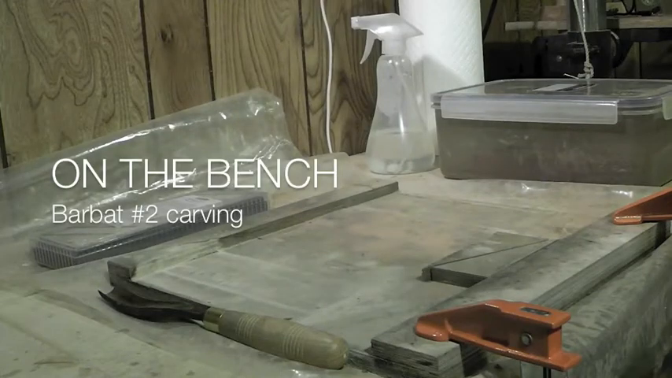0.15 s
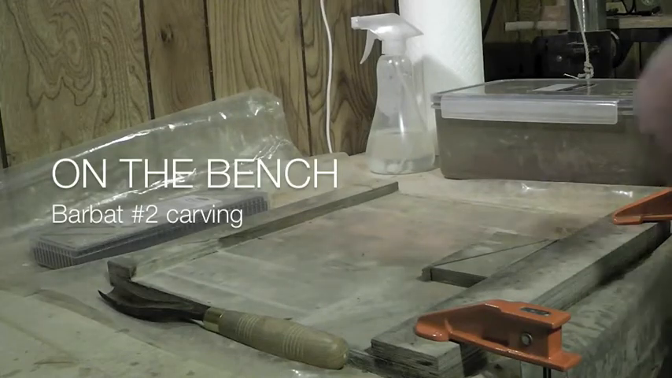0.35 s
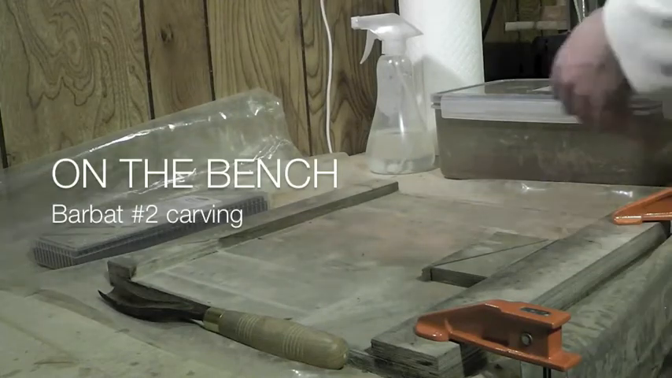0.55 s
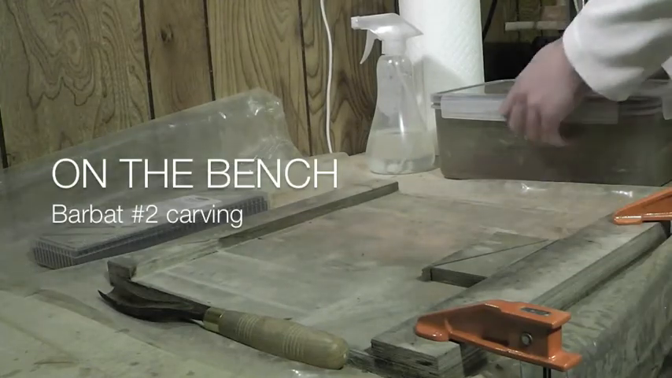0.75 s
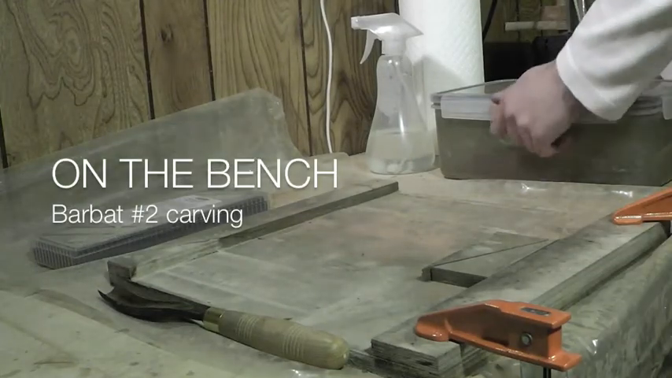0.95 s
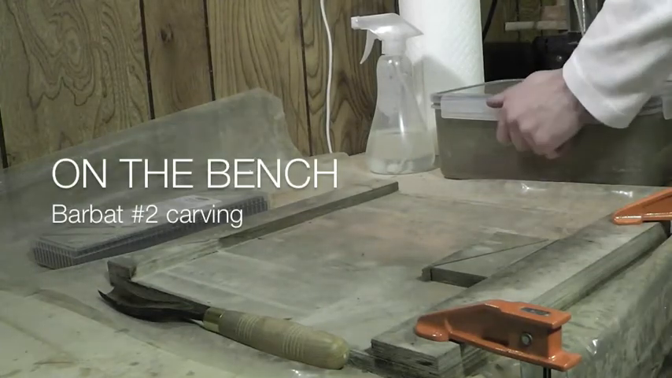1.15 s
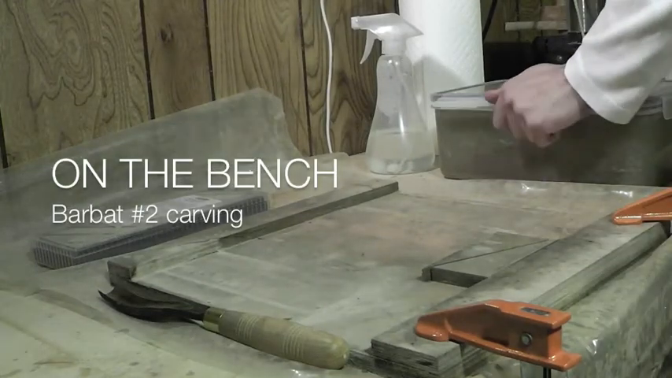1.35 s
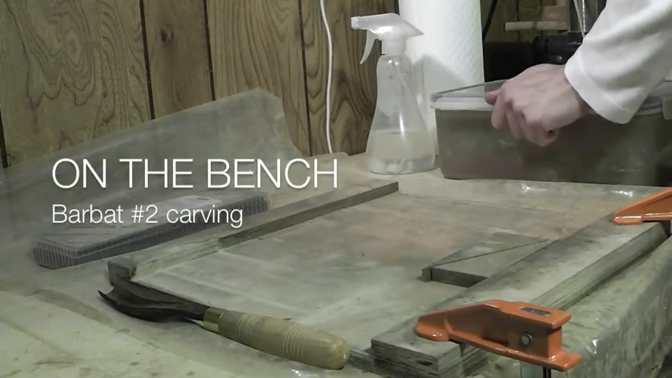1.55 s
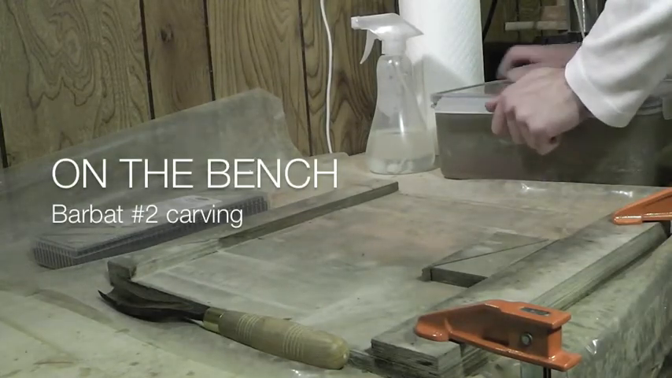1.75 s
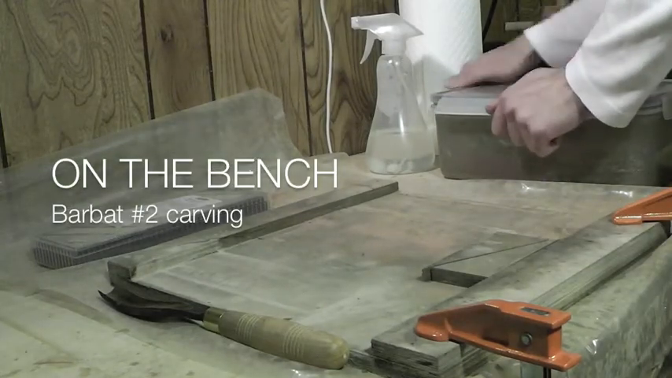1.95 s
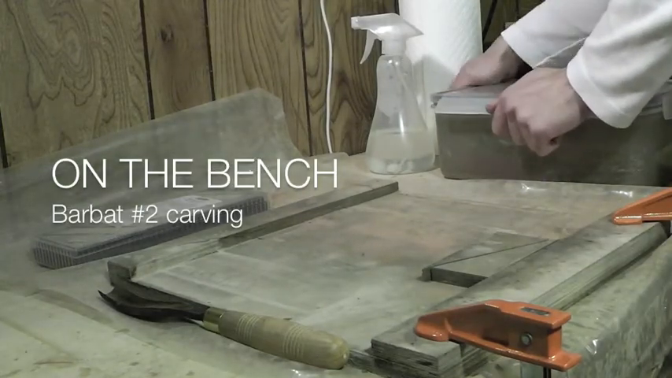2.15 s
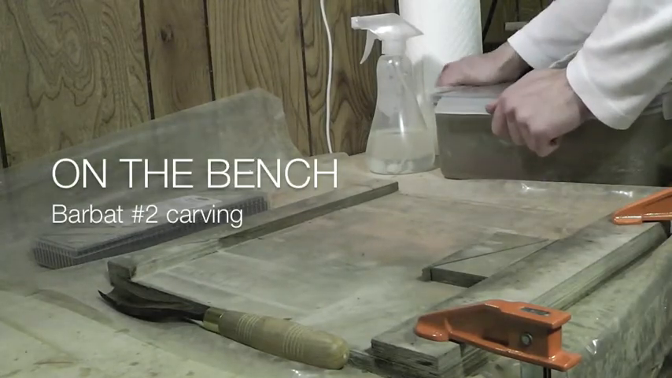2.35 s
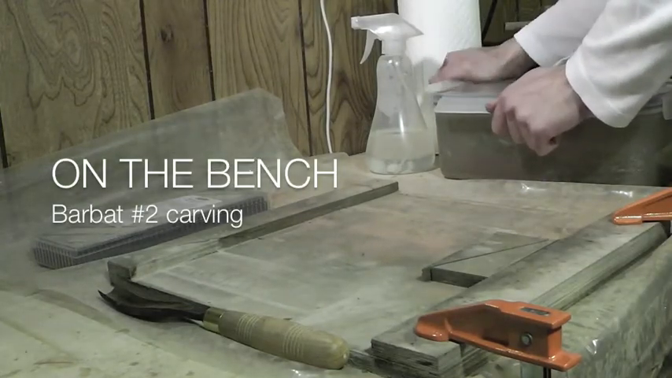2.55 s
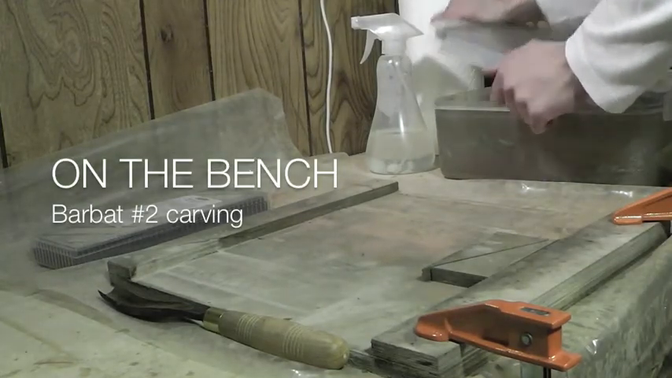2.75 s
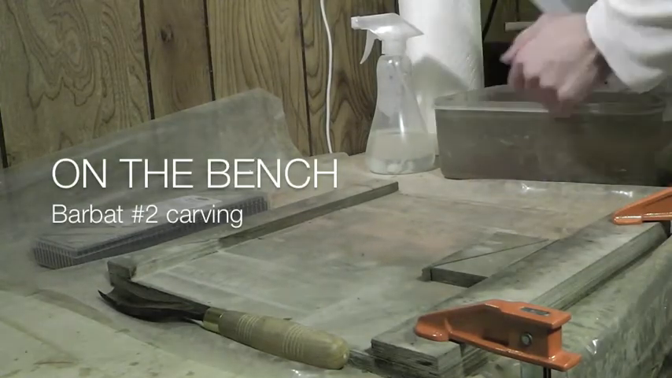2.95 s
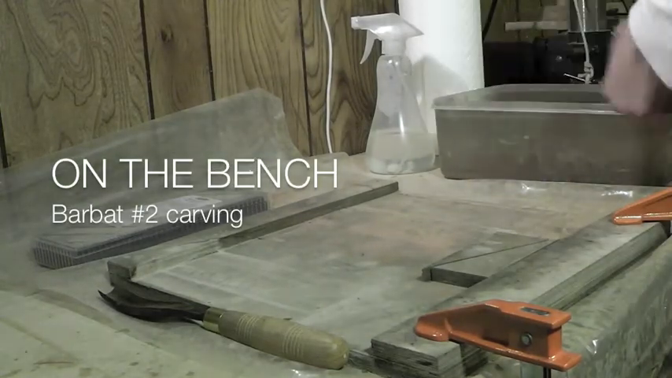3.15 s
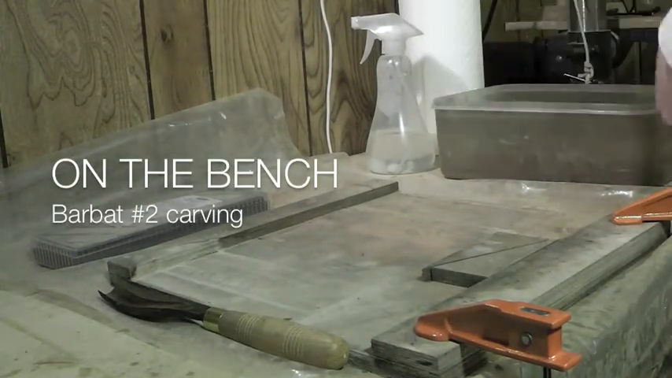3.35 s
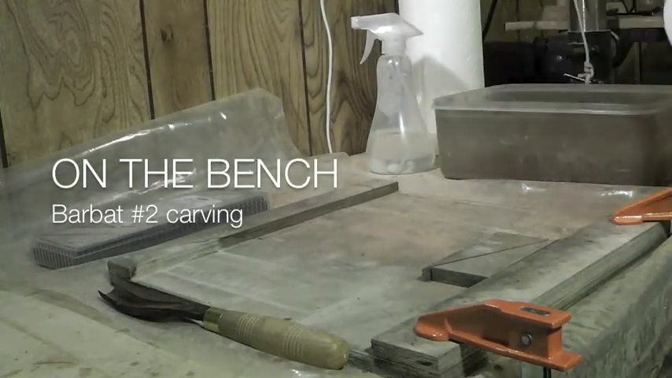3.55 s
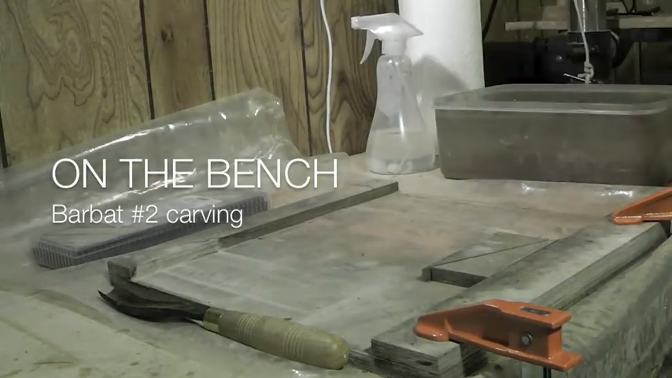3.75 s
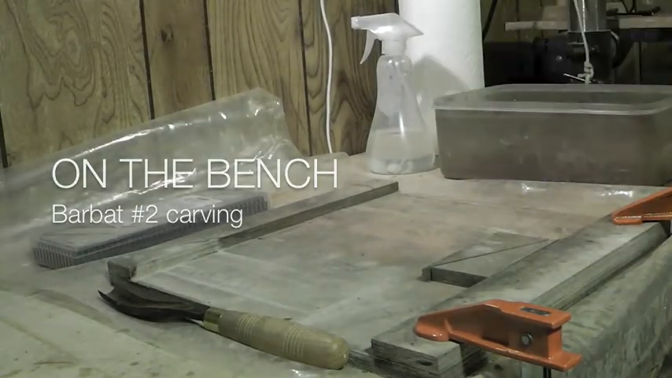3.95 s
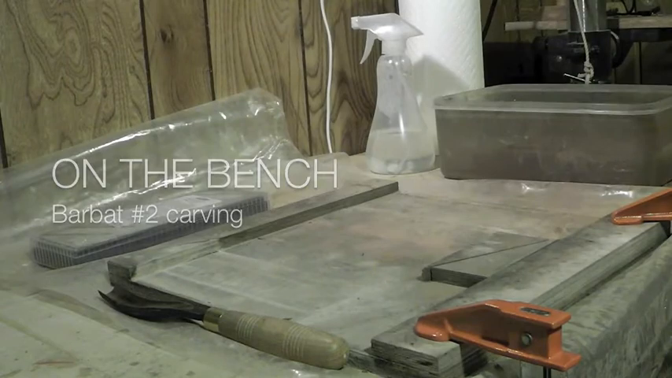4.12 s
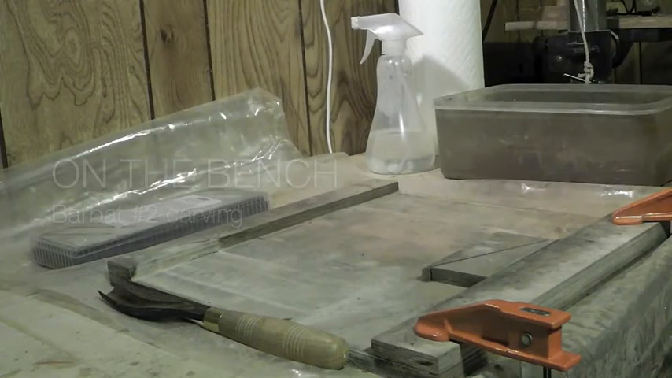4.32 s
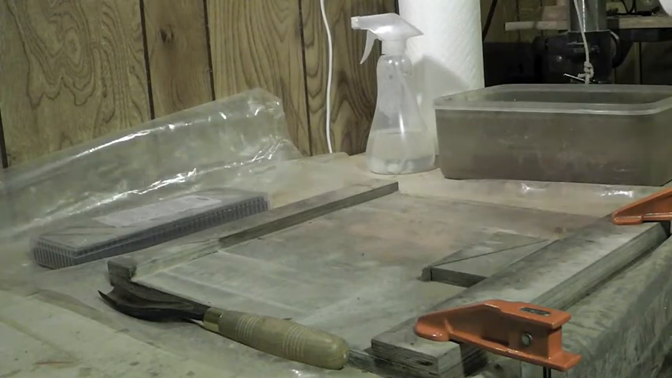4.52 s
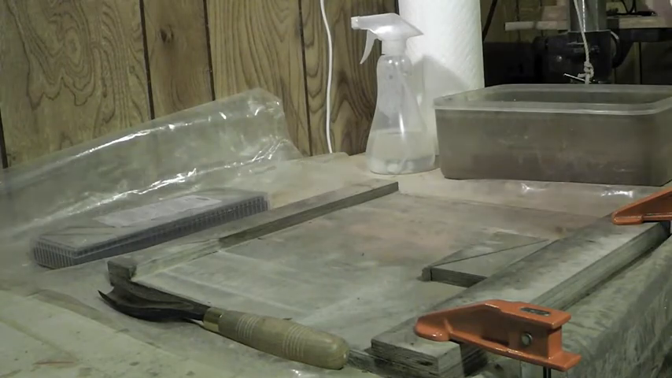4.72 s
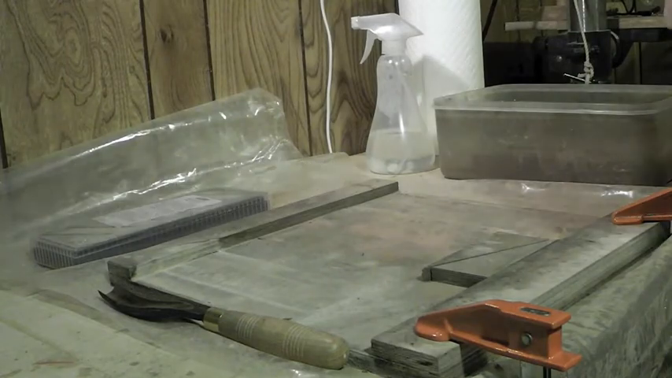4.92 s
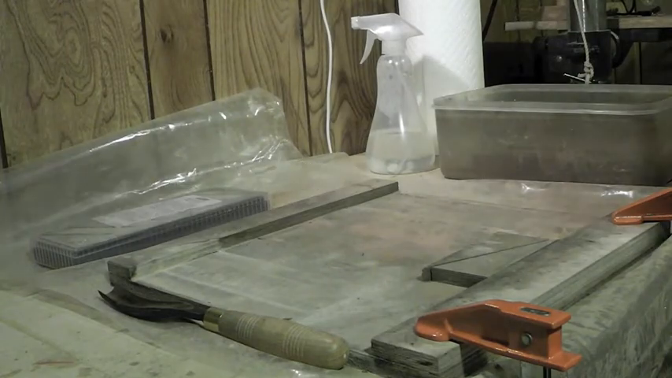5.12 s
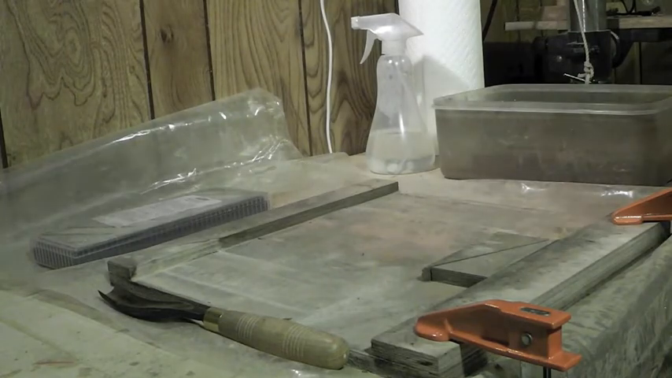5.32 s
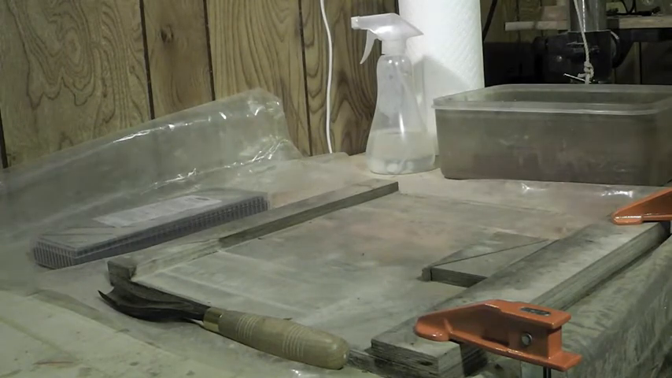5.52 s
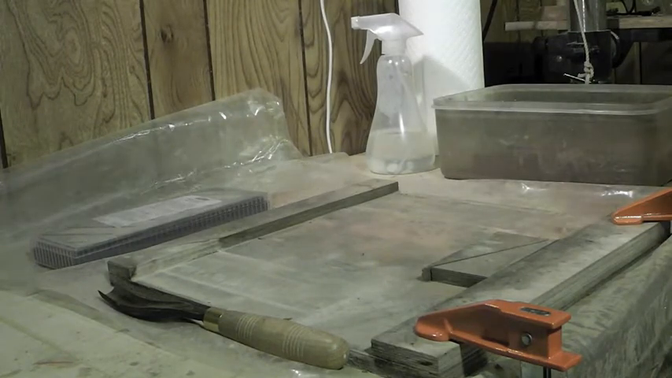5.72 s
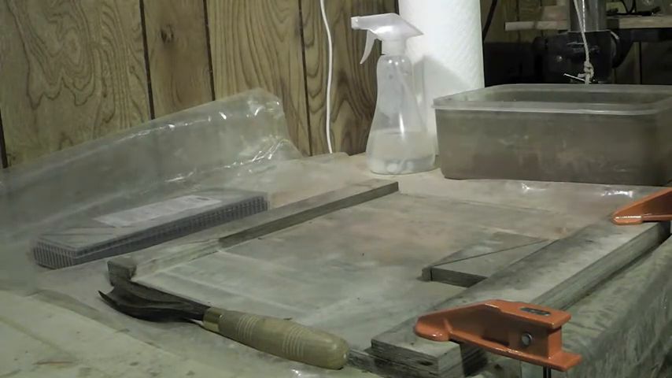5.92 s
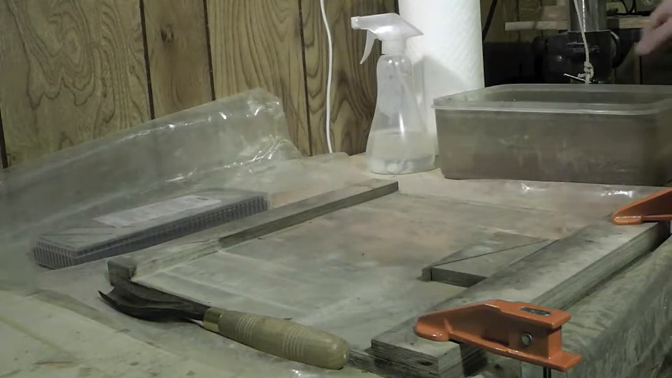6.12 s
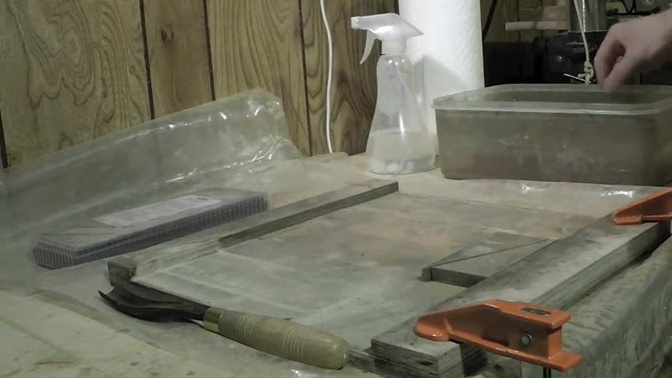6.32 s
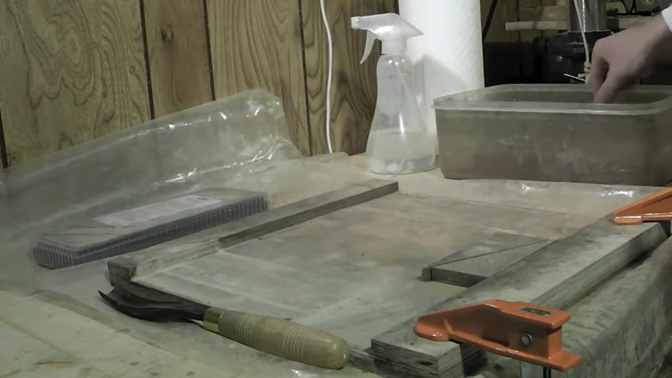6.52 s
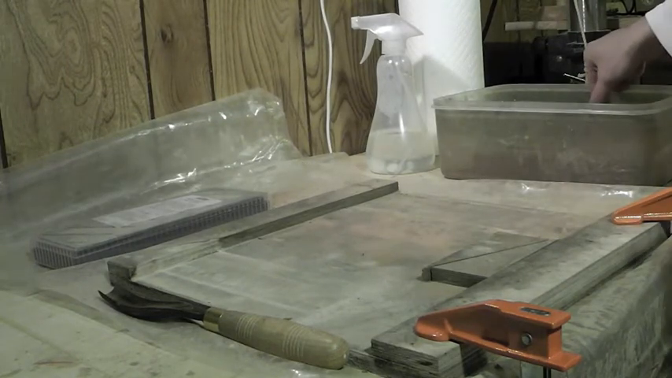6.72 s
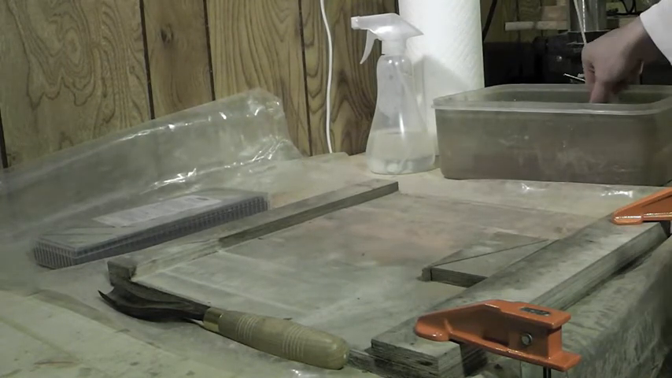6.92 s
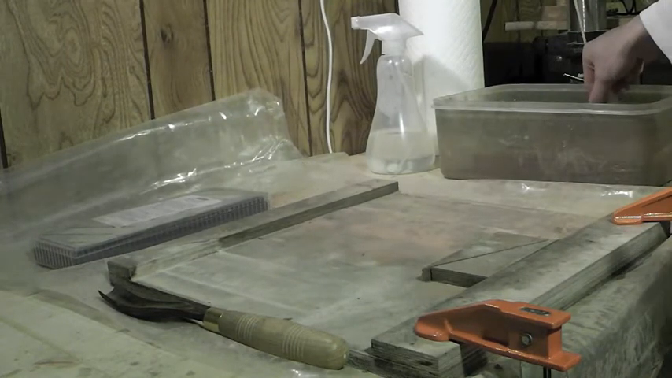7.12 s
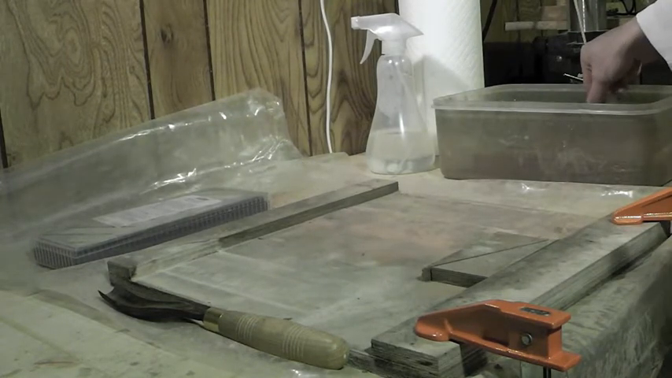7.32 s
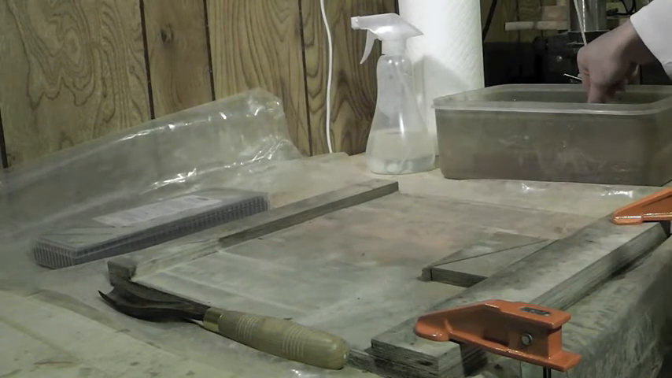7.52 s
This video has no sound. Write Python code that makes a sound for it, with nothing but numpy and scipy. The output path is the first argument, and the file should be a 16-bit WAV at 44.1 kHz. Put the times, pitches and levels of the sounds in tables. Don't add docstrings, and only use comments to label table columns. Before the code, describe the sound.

Two loud hollow plastic latch snaps a second apart, then a lid lifted off with light bumps, scraping and sleeve rustle, later set down softly.

```python
import sys
import numpy as np
from scipy import signal
from scipy.fft import rfft, irfft, next_fast_len
from scipy.io import wavfile
from scipy.ndimage import uniform_filter1d

SR = 44100
rng = np.random.default_rng(int(sys.argv[2]) if len(sys.argv) > 2 else 0)


def boost_factor(decibels):
    exponent = np.asarray(decibels, float) / 20
    return 10 ** exponent


def store_pcm(level_fs):
    pcm = np.round(np.clip(level_fs, -1, 1) * 32767).astype(np.int16)
    wavfile.write(sys.argv[1], SR, np.atleast_2d(pcm).T)


N = 334101

# pitch_hz, level_db, t60_s
BOX_SHUT = [(168, -12, 0.076), (267, 0, 0.087), (337, -8.5, 0.13), (433, -8.5, 0.13), (501.7, -8, 0.082),
            (600, -8, .15), (640, -5, 0.19), (684, -20, 0.15), (805.7, -13.5, .2), (911, -14.5, 0.23),
            (988, -4.5, 0.15), (1100, -27, 0.37), (1306, -17, .1), (1640, -19, 0.16)]
# pitch_hz, level_db, t60_s
LID = [(250, -10.5, 0.23), (392, -6, 0.045), (569.6, -1, 0.14), (700, -3.5, 0.071), (950, 0, 0.092),
       (1491, -13.5, 0.12)]


def evened(x):
    return x / np.sqrt(np.mean(x ** 2) + 1e-20)


def read(points, hz):
    f, value = np.transpose(points)
    return np.interp(np.log(hz + 1), np.log(f + 1), value)


def add(mix, start_s, sound, pan_db):
    part = mix[:, round(start_s * SR):][:, :sound.shape[-1]]
    sides = boost_factor(np.array([[.5], [-.5]]) * pan_db)
    part += (sides * sound)[:, :part.shape[1]]


def coloured(x, points):
    size = next_fast_len(len(x))
    gain = boost_factor(read(points, np.fft.rfftfreq(size, 1 / SR)))
    return evened(irfft(rfft(x, size) * gain, size)[:len(x)])


def resonate(x, hz, width_hz):
    r = np.exp(-np.pi * width_hz / SR)
    pole = r * np.exp(2j * np.pi * hz / SR)
    return 2 * signal.lfilter([1 - r], [1, -pole], x).real


def modes(hz, level_db, t60_s, t, turns):
    decay = np.exp(-np.log(1000) * t / t60_s)
    return (boost_factor(level_db) * decay * np.sin(2 * np.pi * (hz * t + turns))).sum(0)


def pulse(hz, t, u):
    return np.sin(2 * np.pi * hz * t) * u ** 2 * np.exp(2 - 2 * u)


def knock(strong, peak_db, hz, crack_db, ring, t60_s, cycles, reach_db_per_octave, strong_db, crack_s):
    # pitch_hz, level_db
    weak_modes = [(120, -13.5), (200, -10.5), (400, -6.5), (700, -2.5), (1100, -1), (1600, 1), (2100, -9.5),
                  (2600, -24), (3500, -26.5)]
    # pitch_hz, level_db_per_hz
    crack_spectrum = [(1500, -2.5), (2200, -2), (3300, -11), (4200, -6.5), (6000, -11.5), (10000, -11.5),
                      (13000, -18.5), (16000, -26)]
    t = np.arange(SR // 6) / SR
    u = t * max(hz, 260) / cycles
    blow = pulse(hz, t, u)

    crowd_hz = np.geomspace(130, 3500, num=56)[:, None] * rng.uniform(0.93, 1.03, (56, 1))
    crowd_db = read(weak_modes, crowd_hz) - reach_db_per_octave * abs(np.log2(crowd_hz / hz))
    crowd_t60_s = np.clip(t60_s, .02, .16) * (600 / crowd_hz) ** 0.19
    panels = modes(crowd_hz, crowd_db, crowd_t60_s, t, rng.random(crowd_hz.shape))
    mode_hz, mode_db, mode_t60_s = np.transpose(strong)[:, :, None]
    mode_db = mode_db + strong_db - reach_db_per_octave * abs(np.log2(mode_hz / hz))
    panels += modes(mode_hz, mode_db, np.clip(mode_t60_s, .02, .35), t, 0)
    panels *= 1 - np.exp(-u ** 2)

    ring = np.clip(ring - 0.02 * peak_db, 0, 1)
    body = (1 - ring) * blow + ring * panels / abs(panels).max()
    crack = coloured(rng.standard_normal(len(t)), crack_spectrum)
    crack *= np.exp(-t / crack_s) * (1 - np.exp(-t * 6000))
    fade = np.sqrt(np.cos(3 * np.pi * t))
    return boost_factor(peak_db) * (body + boost_factor(crack_db) * crack) * fade


def blows(hits, strong, pan_db, **build):
    out = np.zeros((2, N))
    for start_s, *hit in hits:
        add(out, start_s, knock(strong, *hit, **build), pan_db)
    return out


def near_latch():
    # start_s, peak_db, pitch_hz, crack_db
    snaps = [(1.3162, -10, 428.6, -24), (1.3190, 5.5, 730, -29.5), (1.3262, -6.5, 544, -30.5),
             (1.3300, -3.5, 530, -21.5), (1.332, -9, 250, -40.5), (1.339, -14, 481.6, -23),
             (1.3460, -8.5, 814, -31), (1.3640, -11, 671, -33), (1.3892, 3, 558, -22.5),
             (1.3918, 0.5, 1010, -27), (1.3960, -13, 250, -38.5), (1.405, -15.5, 591, -34.5),
             (1.4180, -13.5, 259.7, -43.5), (1.4320, -22.5, 649, -41), (1.447, -47, 640, -60),
             (1.484, -32, 495, -42), (1.5240, -33, 650, -53)]
    return blows(snaps, BOX_SHUT, .6, ring=0.21, t60_s=0.12, cycles=0.76,
                 reach_db_per_octave=5.1, strong_db=6.5, crack_s=0.0056)


def far_latch():
    # start_s, peak_db, pitch_hz, crack_db
    snaps = [(2.313, -43, 1100, -16), (2.326, -11, 640, -17.5), (2.33, 1.5, 754, -24),
             (2.3324, -4, 320, -17), (2.333, -19, 1450, -5), (2.337, -5.5, 257, -15),
             (2.3430, -8.5, 202, -22), (2.3463, -6, 331, -16), (2.354, -12.5, 298, -14.5),
             (2.3660, -12.5, 420, -15), (2.382, -16, 480, -31), (2.4020, -25.5, 620, -14),
             (2.429, -32, 500, -18)]
    # pitch_hz, level_db, t60_s
    box_opening = [(176, 12.5, 0.028), (288, -0.5, 0.057), (395.6, -3.5, 0.13), (440.4, 2, 0.12),
                   (470, -6.5, 0.078), (600, 2.5, 0.12), (697, -7.5, 0.12), (773, 0.5, 0.077),
                   (956, -15.5, 0.13), (1310, -14, 0.16), (1476, -10, 0.081), (1778, -20, 0.091),
                   (2660, -14, 0.07), (3830, -32.5, 0.089)]
    return blows(snaps, box_opening, .6, ring=0.33, t60_s=0.043, cycles=0.52,
                 reach_db_per_octave=1.1, strong_db=3, crack_s=0.0037)


def finger_knocks():
    # start_s, peak_db, pitch_hz, crack_db
    landings = [(0.336, -38, 406, -30.5), (0.361, -37.5, 228, -34.5), (.357, -35, 640, -37),
                (0.579, -48, 1620, -30), (0.809, -26.5, 200, -32), (0.816, -30.5, 600, -33),
                (.841, -30.5, 618, -30), (0.839, -27.5, 180.7, -25), (.865, -44.5, 610, -30),
                (.993, -40.5, 1806, -22), (1.0, -42, 605, -29), (1.005, -38.5, 1850, -25),
                (1.127, -42, 1493, -21), (1.149, -45.5, 569, -13.5), (1.18, -36.5, 622, -14),
                (1.187, -33, 240.6, -25), (2.143, -22.5, 796, -22), (2.071, -42, 266, -30)]
    return blows(landings, BOX_SHUT, .8, ring=0.058, t60_s=0.099, cycles=1.8,
                 reach_db_per_octave=9.9, strong_db=2.0, crack_s=0.0057)


def lid_bumps():
    # start_s, peak_db, pitch_hz, crack_db
    bumps = [(2.625, -35, 490, -29), (2.650, -32.5, 192, -45), (2.656, -29, 328, -25), (2.679, -49, 245, 0),
             (2.738, -36, 576, -26), (2.746, -32, 915, -28), (2.752, -38, 574, -16),
             (2.765, -25.5, 950, -20), (2.779, -20.5, 620, -23), (2.784, -22, 573, -27),
             (2.802, -27.5, 912, -17), (2.840, -35, 600, -29), (3.014, -17.5, 734, -31.5),
             (3.024, -27, 755, -33), (3.051, -26, 730, -24), (3.058, -37, 740, -18), (3.055, -33, 191, -40),
             (3.077, -26, 676, -23), (3.068, -30.5, 170, -40), (3.109, -42, 450, -22),
             (3.1, -34.5, 174, -45), (3.02, -32, 265, -39), (3.237, -27, 890, -18.5),
             (3.241, -27.5, 400, -28), (3.55, -43.5, 923, -27), (4.066, -46, 318, -14),
             (4.067, -40, 900, -17.5)]
    return blows(bumps, LID, .8, ring=0.029, t60_s=0.086, cycles=1.53,
                 reach_db_per_octave=5.6, strong_db=0.5, crack_s=0.0088)


def lid_set_down():
    # start_s, peak_db, pitch_hz, crack_db
    landings = [
        (5.223, -24, 1120, -14.5),
        (5.230, -31.5, 560, -15),
        (5.410, -31, 560, -35),
        (5.422, -32, 550, -39),
        (5.495, -36, 810, -24),
        (5.503, -36.5, 850, -26),
        (5.55, -47, 560, -35),
    ]
    hidden = blows(landings, LID, .8, ring=0.25, t60_s=0.22, cycles=1.2,
                   reach_db_per_octave=7.6, strong_db=9.0, crack_s=0.015)
    return signal.lfilter(*signal.butter(2, 4800, fs=SR), boost_factor(1.5) * hidden)


def rim_ticks():
    # start_s, peak_db, pitch_hz, pan_db
    ticks = [(1.181, -33, 9000, 5), (1.3967, -36, 10020, -2), (2.334, -13.5, 9800, 0),
             (2.3408, -9.5, 8800, 1), (2.3387, -13, 3980, -13), (2.137, -36, 4560, -2),
             (2.6305, -52, 10300, -2), (2.681, -34, 4150, -2.5), (2.75, -28, 10100, -3),
             (2.781, -31, 10500, -9), (2.805, -48, 4330, -1.5), (3.0355, -36, 10900, -8),
             (3.048, -27.5, 9400, -4), (3.1822, -49, 12100, -15), (3.453, -53.5, 11470, 0.5),
             (3.5444, -51, 10400, -1.5), (3.815, -43, 4510, 12), (4.165, -41.5, 12700, -3),
             (4.2527, -43, 4730, 9), (4.381, -37.5, 4770, 2), (5.3512, -50, 4210, -5)]
    out, t = np.zeros((2, N)), np.arange(400) / SR
    for start_s, peak_db, hz, pan_db in ticks:
        burst = evened(resonate(rng.standard_normal(len(t)), hz, 2500))
        add(out, start_s, boost_factor(peak_db - 5.5) * burst * np.exp(-t / 0.00088), pan_db)
    return out


def flexes():
    # start_s, peak_db, pitch_hz, cycles_to_peak
    first_flexes = [(.357, -42, 626, .8), (.818, -42, 615, 1.3), (.994, -44, 1700, 1.2),
                    (1.322, -6, 800, 1.9), (1.334, -20, 250, 2.8), (1.345, -16, 850, 2.2),
                    (1.352, -22, 760, 3), (1.362, -12, 686, 2.1), (1.376, -22, 725, 3.8),
                    (1.393, -15, 1024, 3), (1.402, -18, 640, 3.3), (1.414, -16.5, 640, 3),
                    (1.42, -19.5, 250, 1.26), (1.436, -20.5, 636, 3.8), (1.447, -25, 663, 4),
                    (1.468, -34, 820, 5), (1.484, -27, 443, 1.2), (1.496, -35, 550, 1.8),
                    (1.521, -30, 680, 3), (1.533, -35, 675, 6.1), (1.562, -43, 674, 2.6),
                    (1.592, -43, 940, 3), (2.138, -44, 9500, 3), (2.146, -41, 4640, 2.2),
                    (2.327, -18.5, 1470, 2), (2.3465, -7.5, 380, 0.42), (2.346, -17, 760, 1.9),
                    (2.37, -21, 497, 2.7), (2.398, -34, 713, 6.5), (2.422, -33, 751, 6.3),
                    (2.47, -44, 734, 8.7), (2.74, -35, 572, 6.5), (2.781, -31, 1010, 4),
                    (2.803, -34, 1060, 1.7), (2.838, -39, 890, 1.8), (2.846, -38, 572, 3.1),
                    (5.2226, -25.5, 1740, 1.6), (5.227, -33, 1010, 2.6), (5.238, -38, 1140, 2.5),
                    (5.25, -34.5, 559, 4.4), (5.268, -38, 1000, 3.2), (5.32, -44, 580, 5),
                    (5.348, -47, 580, 3), (5.426, -36, 557, 3.7), (5.45, -48, 1444, 15),
                    (5.478, -41, 540, 3.5), (5.502, -37, 800, 2.7), (5.498, -44, 1470, 14),
                    (5.55, -42, 550, 4.7), (5.568, -45.5, 555, 6.9)]
    # start_s, peak_db, pitch_hz, cycles_to_peak
    more_flexes = [(1.126, -41, 1500, .8), (1.1, -41.5, 4800, 1), (1.2, -46, 1850, 4),
                   (1.399, -16.5, 250, 2.8), (1.325, -18, 250, 2.6), (4.2527, -47, 4800, 1.5),
                   (5.95, -54, 4600, 1), (5.407, -37, 800, 1.4), (5.23, -37.5, 336, 1.6),
                   (5.415, -42, 350, 2.2), (3.2, -45, 142, 2.4), (2.66, -40, 260, 2),
                   (1.317, -20.5, 85, 0.54), (1.389, -32, 110, .8), (2.332, -14, 250, 0.89),
                   (2.339, -14, 271, 1.9), (2.355, -23, 290, 2), (2.313, -45, 750, 2),
                   (2.313, -46, 1940, 3), (3.016, -33, 1600, 1.8), (3.036, -40, 1550, 3.7),
                   (3.058, -35, 750, 3), (3.066, -34, 710, 3.3), (3.09, -40, 800, 3.7),
                   (3.122, -46, 715, 3.5), (3.237, -30.5, 670, .8), (3.243, -33, 680, 1.5),
                   (3.27, -48, 730, 3.2)]
    out, t = np.zeros((2, N)), np.arange(SR // 10) / SR
    for start_s, peak_db, hz, cycles in first_flexes + more_flexes:
        u = t * hz / max(cycles, .2)
        add(out, start_s, boost_factor(peak_db) * pulse(hz, t, u), .8)
    return out


def strokes(rows):
    fastest_s, level_db, rise_s, fall_s, colour_db = np.transpose(rows)[:, :, None]
    t = np.arange(0, N, 64) / SR - fastest_s
    return boost_factor(level_db - 20 * np.maximum(-t / rise_s, t / fall_s)), colour_db


def overlap(gains):
    total = np.sqrt((gains ** 2).sum(0))
    return np.interp(np.arange(N), np.linspace(0, N, num=gains.shape[1]), total)


def scrape():
    # fastest_s, level_db, rise_s, fall_s, rim_against_body_db
    drags = [(.365, -57.5, 0.063, 0.16, -2), (.6, -67, 0.36, 0.25, 2.5), (.84, -52.5, 0.17, 0.56, -9.5),
             (1.005, -65, 0.041, 0.13, 5), (1.2, -50.5, 0.087, 0.077, -7.5), (1.55, -47.5, 0.11, 0.26, -31),
             (1.72, -63, 0.026, 0.83, 0.5), (1.97, -54, 0.32, 0.19, -7.5), (2.17, -41.5, 0.19, 0.1, -13),
             (2.49, -53, 0.07, 0.24, -9), (2.65, -42, 0.064, 0.19, -12.5), (2.76, -50, 0.12, 0.2, -3),
             (2.9, -54.5, 0.16, 0.67, -20), (3.07, -49, 0.12, 0.11, -3), (1.6, -55, .15, 0.1, -10),
             (3.3, -60, 0.35, 0.71, -4.5), (3.66, -60, 0.3, 0.58, -3.5), (4.06, -63, 0.45, 1, -2.5),
             (5.274, -42.5, 0.034, 0.18, -4.5), (5.468, -47.5, 0.28, 0.16, -4.5),
             (5.54, -44, 0.2, 0.079, -13), (5.61, -56.5, .2, 0.03, 0.5)]
    gains, rim_db = strokes(drags)
    slips = rng.random(N) < 2500 / SR
    slips = slips * boost_factor(2.0 * np.minimum(rng.exponential(1, N), 4)) * rng.choice([-1, 1], N)
    lid = evened(sum(boost_factor(level_db) * resonate(slips, hz, 60) for hz, level_db, _ in LID))
    body = coloured(slips, [(150, -18.5), (280, 3.5), (650, 2.5), (1000, -4.5), (1500, -31.5), (4000, -61.5)])
    body = evened(body + 0.77 * lid)
    rim = coloured(slips, [(800, -21.5), (1250, 3.5), (2000, 0.5), (2500, -19.5), (3500, -35.5), (5000, -47.5)])
    both = boost_factor(-2.5) * overlap(gains) * body + overlap(gains * boost_factor(rim_db)) * rim
    return boost_factor([[.2], [-.2]]) * both


def rustle():
    # fastest_s, level_db, rise_s, fall_s, brightness_db
    rubs = [(.55, -64.5, 1.5, 0.56, 0.5), (.842, -56.5, .06, 0.12, 2), (.86, -60.5, .35, 0.77, -1.5),
            (1.185, -65, 0.014, 0.072, -5), (1.71, -57, .04, .1, 2), (1.765, -49.5, 0.11, 0.11, 0.5),
            (1.89, -49, 0.11, 0.17, 3.5), (1.94, -51, .1, .1, 3), (2.01, -49, 0.14, .07, 4),
            (2.09, -58, .08, .1, 4), (2.146, -48.5, 0.13, 0.063, -1), (2.5, -64, 0.13, .4, -1),
            (2.64, -59.5, 0.059, 0.14, 3.5), (2.75, -49, 0.13, .13, 2.5), (2.91, -63.5, 0.14, 0.26, 4.5),
            (3.04, -55.5, 0.19, 0.2, -2), (3.24, -50, 0.011, 0.071, 0.5), (3.4, -63, 0.2, .04, 0.5),
            (3.46, -58, .03, 0.11, 3), (3.56, -58.5, 0.039, 0.73, 1), (3.78, -63, 0.67, .3, -2),
            (4.07, -57, 0.21, 0.13, 3), (4.165, -61, 0.037, 0.44, 0), (4.36, -63, 0.46, 0.098, 2),
            (5.36, -61.5, 0.046, .2, -4), (5.44, -52.5, 0.16, 0.2, -1.5), (5.984, -64, 0.37, 0.13, 0.5)]
    # hz, level_db_per_hz
    cloth = [(1760, -17), (3000, -11), (3240, -18), (3910, -5), (6170, -4.5), (9330, -5.5), (10700, -2.5),
             (15100, -14.5), (16000, -18)]
    gains, bright_db = strokes(rubs)
    pulsing = boost_factor(1.4 * evened(uniform_filter1d(rng.standard_normal(N), 900)))
    snaps = rng.random(N) < 220 / SR
    snaps = snaps * boost_factor(3.2 * np.minimum(rng.exponential(1, N), 3.5))
    grain = pulsing * (1 + .3 * signal.lfilter([1], [1, -.97], snaps))
    a, b = (coloured(rng.standard_normal(N) * grain, cloth) for _ in range(2))
    pair = evened(np.array([a, 0.77 * a + 0.71 * b]))
    dull = signal.filtfilt(*signal.butter(3, 7500, fs=SR), pair)
    bright = pair - dull
    pair = dull * overlap(gains / boost_factor(bright_db)) + bright * overlap(gains * boost_factor(bright_db))
    pan_db = -1.5
    return boost_factor(np.array([[.5], [-.5]]) * pan_db - 2.0) * pair


def rumble():
    # time_s, swell_db
    swell = [
        (0, -1),
        (0.695, -6),
        (1.7, 5),
        (2.8, -1),
        (4.3, 0.5),
        (5.201, 2),
        (5.6, 7.5),
        (6.8, 13),
        (7.58, 9.5),
    ]
    # rest_db, share_of_swell
    layers = [
        (-78, 1.5),
        (-63.5, 0.92),
        (-66.5, 0.33),
    ]
    # pitch_hz, width_hz, level_db
    deep = [(60, 8, -4), (83.5, 17, -0.5)]
    low = [(174, 46, 1), (250, 18, -2.5)]
    high = [(459.6, 31, -8), (591, 39, -1), (708, 100, -3), (960.5, 140, -9)]
    swell_db = np.interp(np.arange(N) / SR, *np.transpose(swell))
    out = np.zeros(N)
    for (rest_db, share), peaks in zip(layers, (deep, low, high)):
        noise = rng.standard_normal(N)
        part = sum(boost_factor(level_db) * evened(resonate(resonate(noise, hz, width_hz), hz, width_hz))
                   for hz, width_hz, level_db in peaks)
        out += boost_factor(rest_db - 2.5 + share * swell_db) * evened(part)
    return out


def floor():
    # hz, left_right_likeness
    likeness = [(25, .8), (60, 0.51), (180, 0.41), (550, -0.37), (1650, -0.46), (4970, -0.14),
                (15000, -0.27)]
    # hz, level_db_per_hz
    tone = [(12, -14), (30, -5), (62, -5.5), (90, -17), (200, -12), (320, -17), (600, -16.5), (1000, -18),
            (2000, -26.5), (2500, -38), (3300, -40), (3900, -33.5), (7000, -34.5), (16000, -36.5)]
    frames, hz = N // 512 + 5, np.fft.rfftfreq(2048, 1 / SR)
    a, b, c, d = rng.standard_normal((frames, 1025, 4)).T
    same = np.clip(read(likeness, hz), -1, 1)[:, None]
    left = a + 1j * b
    right = same * left + np.sqrt(1 - same ** 2) * (c + 1j * d)
    z = np.array([left, right]) * boost_factor(read(tone, hz)[:, None])
    hiss = signal.istft(z, nperseg=2048, noverlap=1536)[1][:, :N]
    return boost_factor(-54 - 2) * evened(hiss)


def bench(near):
    # pitch_hz, width_hz, level_db
    room_modes = [(166, 8.1, 1), (245, 23.2, -4.5), (590, 14, -7), (702, 12, -11)]
    panels = signal.sosfilt(signal.butter(6, 150, "high", fs=SR, output="sos"), near)
    thud = signal.sosfilt(signal.butter(2, 95, "low", fs=SR, output="sos"), near)
    ringing = sum(boost_factor(level_db) * resonate(panels, hz, width_hz) for hz, width_hz, level_db in room_modes)
    return panels + boost_factor(-5.0) * thud + ringing


def ports(x):
    # hz, level_db
    side_level = [(2000, -45.5), (4400, -22), (8000, -11), (11000, -6), (14000, 0), (16000, -1.5)]
    # hz, phase_rad
    side_turn = [(4000, 3.0), (8000, 2.8), (12000, 1.9), (16000, 1.6)]
    # hz, level_db
    sum_level = [(9000, -1.85), (12000, 0), (13500, -5.5), (16000, -5.5)]
    size = next_fast_len(N)
    hz, z = np.fft.rfftfreq(size, 1 / SR), rfft(x, size)
    side = z.mean(0) * boost_factor(read(side_level, hz)) * np.exp(1j * read(side_turn, hz))
    return irfft(z * boost_factor(read(sum_level, hz)) + [side, -side], size)[:, :N]


def shop(x):
    # hz, t60_s
    decay = [(100, 0.42), (300, 0.22), (800, 0.35), (1500, 0.2), (2600, 0.24), (5000, 0.25), (12000, 0.14)]
    # hz, level_db
    wet = [(100, -9.5), (300, -10.5), (1000, -11.5), (3000, -5), (8000, -9.5), (14000, -11.5)]
    # hz, share
    differing = [(110, .35), (250, .16), (1000, .22), (4000, .4), (12000, 1.2)]
    taps = np.zeros((2, SR // 2))
    at = np.arange(120, SR // 2 - 20, 20) + rng.integers(0, 20, (2, (SR // 2 - 121) // 20))
    np.put_along_axis(taps, at, rng.choice([-1., 1.], at.shape), 1)
    hz, t, z = signal.stft(taps, SR, nperseg=256)
    t60_s = read(decay, hz)[:, None]
    z = z * boost_factor(read(wet, hz)[:, None] - 60 * t / t60_s) / np.sqrt(160 * t60_s)
    apart = read(differing, hz)[:, None] * z[1]
    tail = signal.istft(np.array([z[0] + apart, z[0] - apart]), SR, nperseg=256)[1]
    return signal.fftconvolve(x.mean(0)[None], tail, axes=1)[:, :N]


def scene():
    latches = near_latch() + far_latch()
    handling = finger_knocks() + lid_bumps() + lid_set_down() + rim_ticks()
    near = bench(latches + handling + scrape() + flexes())
    return ports(near) + shop(near) + rustle() + rumble() + floor()


def roll_off(x):
    return signal.sosfilt(signal.butter(12, 16490, fs=SR, output="sos"), x)


def record(dry):
    soft = 1.1 * np.tanh(dry / 1.1)
    edge = signal.firwin(255, 15850, window=("kaiser", 8), fs=SR)
    return roll_off(signal.oaconvolve(soft, edge[None], "same"))


dry = scene()
out = record(dry)
store_pcm(out)
```